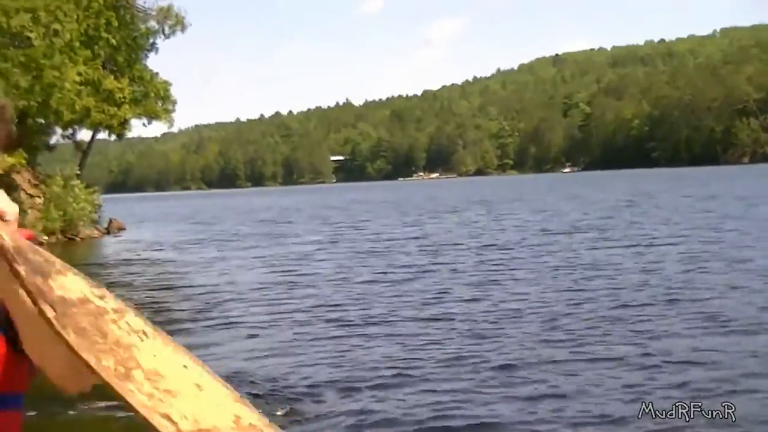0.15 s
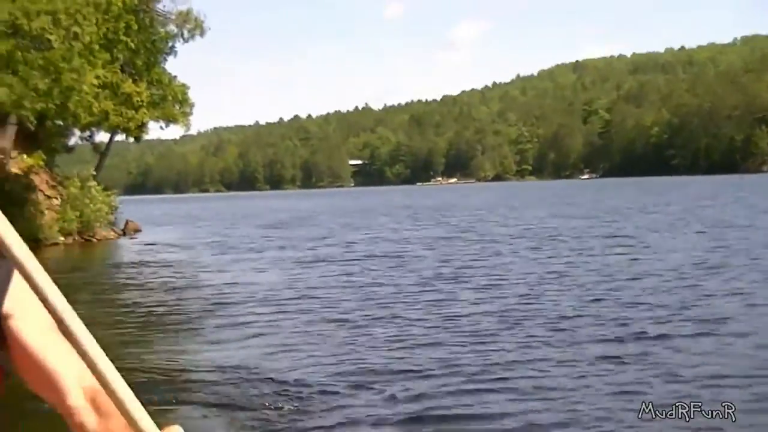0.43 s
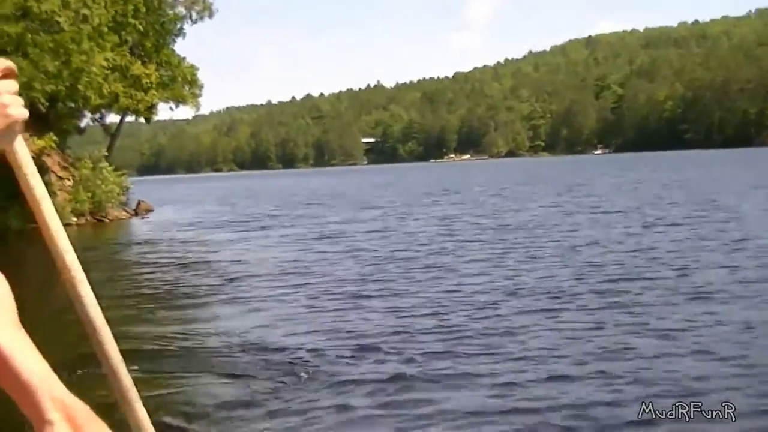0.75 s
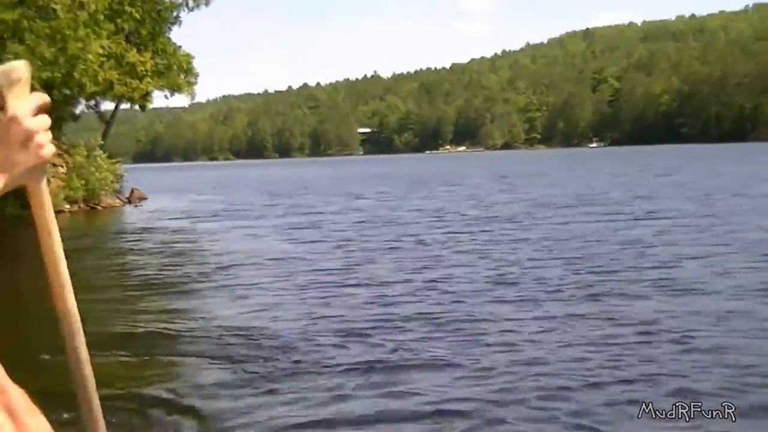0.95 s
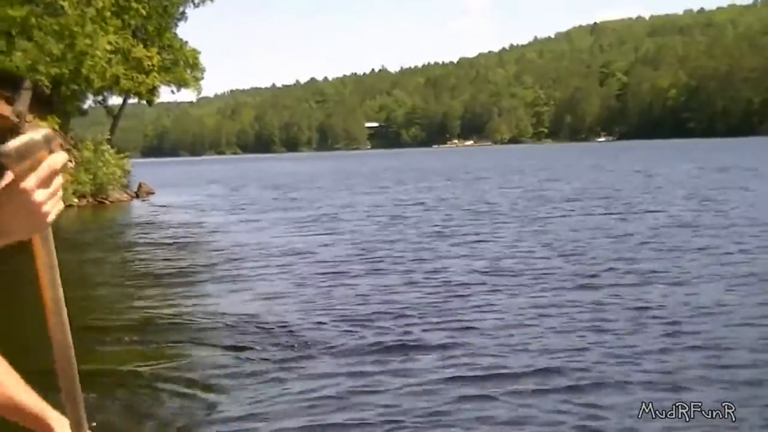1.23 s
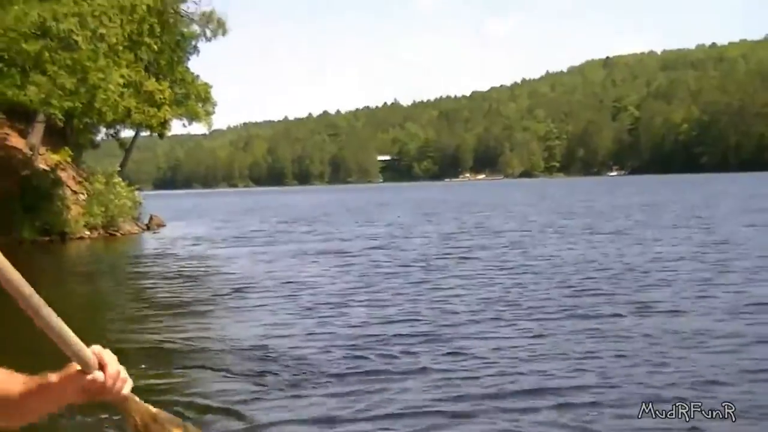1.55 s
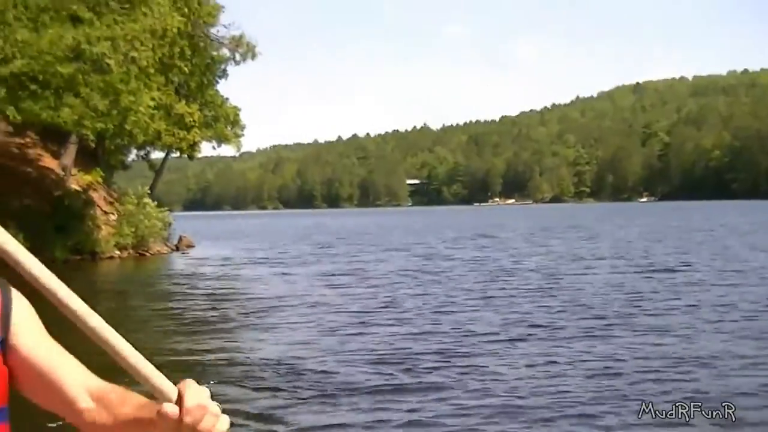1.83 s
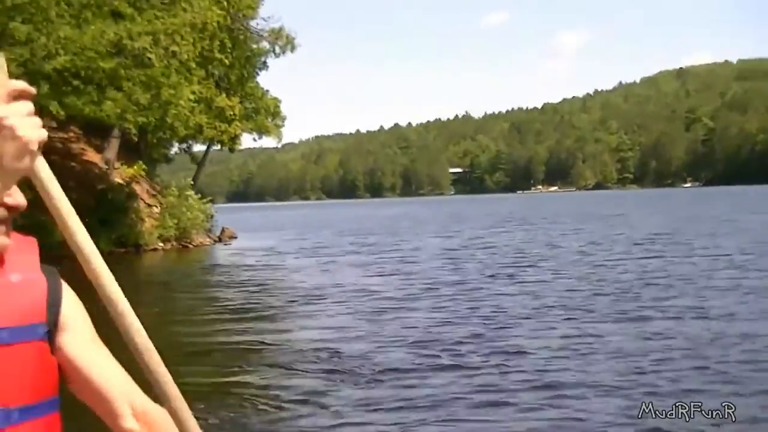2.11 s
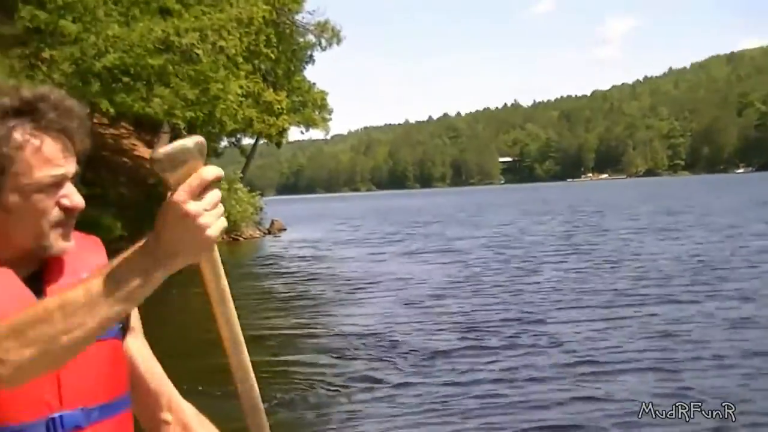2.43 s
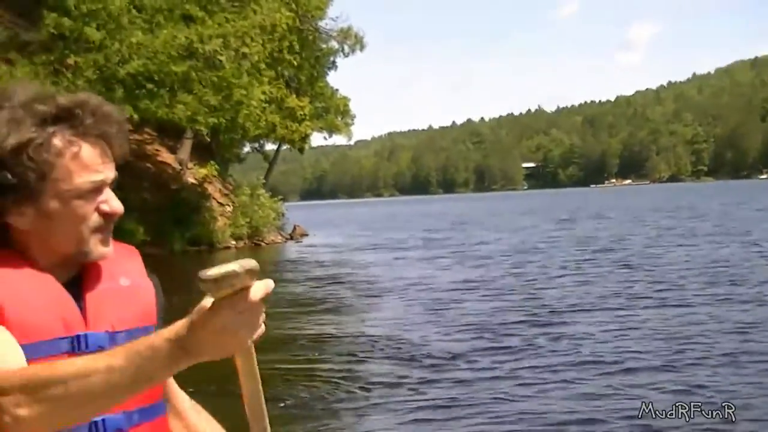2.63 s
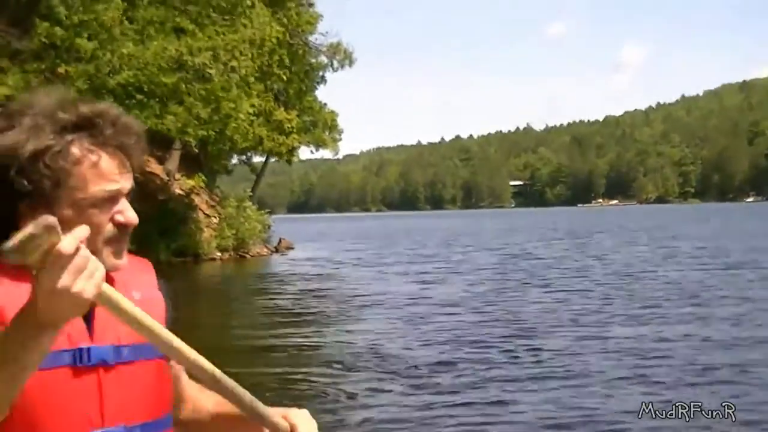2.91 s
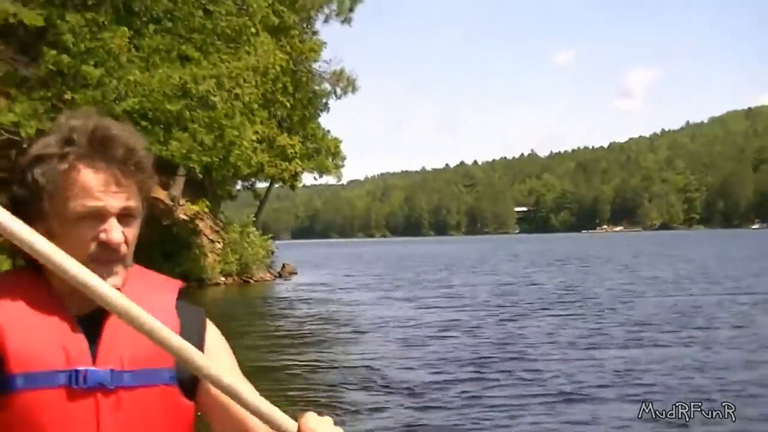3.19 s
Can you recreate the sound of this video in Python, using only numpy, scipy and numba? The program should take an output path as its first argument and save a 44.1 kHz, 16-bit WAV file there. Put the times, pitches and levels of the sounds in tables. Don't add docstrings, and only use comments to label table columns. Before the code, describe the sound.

A paddle slaps into lake water, gurgles and swishes, drips as it lifts, then slaps in louder for a second bubbling stroke; small camera microphone at arm's length, outdoors, with soft low wind puffs.

```python
import sys
import numpy as np
from scipy import signal
from scipy.fft import rfft, irfft
from scipy.io import wavfile
from scipy.ndimage import uniform_filter1d
from numba import njit

SR = 44100
rng = np.random.default_rng(int(sys.argv[2]) if len(sys.argv) > 2 else 0)


def decibels_to_gain(level_db):
    exponent = np.asarray(level_db, float) / 20
    return 10 ** exponent


def wav_record(signal):
    frames = np.transpose(np.atleast_2d(signal))
    bounded = np.clip(frames, -1, 1)
    quanta = np.round(bounded * 32767).astype(np.int16)
    wavfile.write(sys.argv[1], SR, quanta)


N = 147735
BUBBLE_GLIDE = 0.2


def unit(x):
    return x / np.sqrt(np.mean(x ** 2))


def colour(x, points):
    f, db = np.array(points).T
    grid_hz = np.arange(1, 4098) * SR / 8192
    log_gain = np.interp(np.log(grid_hz), np.log(f), db) * np.log(10) / 20
    cepstrum = irfft(log_gain)
    cepstrum[1:4096] *= 2
    cepstrum[4097:] = 0
    response = irfft(np.exp(rfft(cepstrum)))
    return signal.fftconvolve(x, response)[:len(x)]


def walk(rate):
    hold = int(SR / rate)
    steps = np.clip(rng.standard_normal(N // 100)[:N // hold + 1], -2, 2)
    slewed = uniform_filter1d(np.repeat(steps, hold), hold)
    return 1.5 * uniform_filter1d(slewed, hold)[:N]


@njit
def ring(n, start, hz, cycles, size, glide):
    y = np.zeros(n)
    for g in range(len(start)):
        first = int(start[g])
        life = cycles[g] * SR / hz[g]
        phase, step = 0., 2 * np.pi * hz[g] / SR
        for i in range(min(int(2 * life), n - first)):
            phase += min(step * (1 + glide[g] * i / life), 3.)
            swell = min(phase / 9, 1.)
            y[first + i] += size[g] * swell * np.exp(-3.5 * i / life) * np.sin(phase)
    return y


def crowd(rate, low_hz, high_hz, cycles, spread_db, db, tilt_db, count):
    u = rng.random((count, 5)).T
    s = np.cumsum(-np.log(1 - u[0])) / rate
    keep = s < N / SR
    bunching_db = 1.3 * walk(60)[np.minimum(s * SR, N - 1).astype(int)]
    size_db = np.minimum(-spread_db * np.log(1 - u[1]), 4 * spread_db) + bunching_db
    hz = low_hz * (high_hz / low_hz) ** u[2]
    size = decibels_to_gain(size_db + tilt_db * np.log2(hz / low_hz))
    life = cycles * (.5 + u[3])
    glide = 2 * BUBBLE_GLIDE * u[4]
    y = ring(N, s[keep] * SR, hz[keep], life[keep], size[keep], glide[keep])
    return y, db


def bursts(s, db, hz, length, count, low, high, others_db, cycles):
    s, db, hz, length = (np.reshape(v, (-1, 1)) for v in (s, db, hz, length))
    u = rng.random((len(s), 3, count))
    later = np.arange(count) > 0
    start = (s + length * u[:, 0] * later) * SR
    f = np.minimum(hz * np.where(later, low * (high / low) ** u[:, 1], 1), .4 * SR)
    life = np.where(later, cycles * (.5 + u[:, 2]), np.clip(length * hz, 3, 40))
    size = decibels_to_gain(db - 1.0 + others_db * later * (0.32 + u[:, 2]))
    glide = BUBBLE_GLIDE * u[:, 2]
    return ring(N, start.ravel(), f.ravel(), life.ravel(), size.ravel(), glide.ravel())


# [t/s, gurgle level/dB, wash level/dB, spray level/dB]
STIR = [(0, -49, -78, -58), (.41, -77, -63, -68), (0.469, -55.5, -56, -58.5), (.63, -62, -70, -58.5),
        (0.648, -58, -41, -45), (.9, -43, -37.5, -48.5), (1.0, -37, -40, -49), (1.15, -35, -35, -50),
        (1.33, -35, -33, -42.5), (1.385, -40.5, -39, -51.5), (1.68, -47.5, -46, -59),
        (1.8, -44.5, -42.5, -49.5), (2.1, -54.5, -49.5, -61.5), (2.235, -50.5, -43, -50),
        (2.273, -43, -37, -48.5), (2.8, -38, -36.5, -49), (2.9, -45.5, -40, -54),
        (3.35, -49.5, -49.5, -53.5)]
# [rate/(1/s), lowest f/Hz, highest f/Hz, ring/cycles, size spread/dB, level/dB, tilt/(dB per octave)]
GURGLE = (480, 320.5, 1036, 13, 3, 0.5, 6.5)
WASH = (2100, 1106, 3465, 16, 3, -2, -1.5)
SPRAY = (4200, 2940, 14600, 9.9, 2.6, 4, 0.1)
# [f/Hz, level/dB]
SPRAY_COLOUR = [(1470, 29), (2500, 8), (3010, -34), (3880, 0.5), (4770, 6.5), (6590, 6), (13900, -8.5),
                (15700, -8.5)]


def stirred_water():
    t = np.arange(N) / SR
    stir_s, gurgle_db, wash_db, spray_db = np.array(STIR).T
    large, large_db = crowd(*GURGLE, count=4000)
    middle, middle_db = crowd(*WASH, count=12000)
    fine, fine_db = crowd(*SPRAY, count=30000)
    gurgle = unit(large) * decibels_to_gain(large_db + np.interp(t, stir_s, gurgle_db))
    wash = unit(middle) * decibels_to_gain(middle_db + np.interp(t, stir_s, wash_db))
    spray = unit(colour(fine, SPRAY_COLOUR)) * decibels_to_gain(fine_db + np.interp(t, stir_s, spray_db))
    shared_surge = decibels_to_gain(2.1 * walk(120))
    return gurgle + shared_surge * (wash + spray)


# [t/s, peak level/dB, f/Hz, length/s]
PLOPS = [(0.004, -37, 527, 0.04), (0.027, -32, 746, 0.02), (0.101, -32, 774, 0.012),
         (0.524, -40, 1600, 0.012), (0.643, -25.5, 680, 0.023), (0.653, -23.5, 1214, 0.022),
         (0.687, -20, 890, 0.025), (0.71, -24, 1000, 0.015), (0.748, -25, 1470, 0.017),
         (0.813, -32, 1340, 0.011), (0.908, -34, 1100, 0.026), (0.931, -25, 826, 0.015),
         (0.966, -25.5, 560, 0.015), (0.948, -19.5, 1645, 0.016), (0.998, -23, 381, 0.072),
         (1.025, -18.5, 716, 0.02), (1.038, -19.5, 697, 0.02), (1.084, -21, 623, 0.01),
         (1.127, -13, 526, 0.019), (1.149, -16, 640, 0.023), (1.174, -20.5, 676, 0.032),
         (1.22, -22.5, 597, 0.021), (1.285, -15.5, 593, 0.021), (1.315, -14.5, 1126, 0.015),
         (1.348, -11.5, 645, 0.011), (1.441, -20.5, 580, 0.02), (1.555, -31.5, 1510, 0.012),
         (1.693, -31.5, 752, 0.027), (1.738, -26, 1870, 0.023), (1.896, -42, 1270, 0.03),
         (2.099, -33.5, 1410, 0.016), (2.16, -27, 1355, 0.011), (2.257, -26.5, 590, 0.017),
         (2.332, -24, 1720, 0.0089), (2.425, -25, 850, 0.042), (2.461, -13, 846, 0.018),
         (2.474, -19, 585, 0.024), (2.515, -28.5, 281, 0.036), (2.559, -21.5, 1800, 0.012),
         (2.589, -23, 1680, 0.021), (2.658, -18.5, 1880, 0.014), (2.662, -20.5, 856, 0.016),
         (2.733, -22, 1160, 0.012), (2.819, -17.5, 1280, 0.0091), (2.866, -24.5, 1750, 0.011),
         (2.903, -21.5, 629, 0.012), (2.914, -23, 622, 0.027), (3.006, -30.5, 1480, 0.016),
         (3.049, -28.5, 850, 0.019), (3.139, -34, 623, 0.018), (3.277, -36, 696, 0.02)]


def plops():
    return bursts(*np.array(PLOPS).T, count=6, low=0.798, high=1.53, others_db=-10, cycles=11.0)


# [t/s, peak level/dB, f/Hz, length/s]
SLAPS = [
    (0.6754, -14, 1284, 0.015),
    (.676, -14.5, 1835, 0.013),
    (2.2777, -9.5, 1072, 0.0073),
    (2.278, -6, 1300, 0.0089),
]


def slaps():
    return bursts(*np.array(SLAPS).T, count=5, low=0.7, high=1.55, others_db=-4.5, cycles=5.1)


# [t/s, peak level/dB, f/Hz, bright hiss level/dB]
DROPS = [(0.46, -37, 5700, -47), (0.4765, -39, 4550, -35.5), (0.605, -38, 5340, -42),
         (0.6384, -29, 6000, -26), (0.666, -22.5, 5060, -28), (0.839, -32, 2920, -34.5),
         (0.9477, -20, 2860, -42), (1.04, -28, 3100, -55), (1.06, -20.5, 5100, -57),
         (1.068, -20, 3020, -60), (1.0986, -25.5, 5900, -59), (1.2166, -22, 3570, -52),
         (1.267, -45, 3060, -43), (1.315, -16, 2800, -27), (1.4805, -35, 4800, -40),
         (1.5444, -22, 4260, -37), (1.691, -38.5, 7160, -50), (1.772, -36, 7200, -50),
         (1.783, -30, 5760, -38), (1.8554, -35, 5330, -54), (1.869, -32, 7850, -55),
         (1.9085, -37, 5220, -37), (1.931, -30.5, 8190, -48), (1.943, -31.5, 2950, -36),
         (1.9698, -28.5, 2920, -47), (1.9973, -28.5, 4800, -62), (2.077, -29.5, 4540, -51),
         (2.133, -28.5, 5130, -40), (2.167, -25, 5730, -36), (2.1918, -27.5, 5000, -41),
         (2.203, -30, 6430, -56), (2.2233, -25, 6150, -57), (2.2578, -27, 2960, -30),
         (2.361, -38, 4700, -49), (2.38, -26, 3070, -40.5), (2.4526, -36, 5950, -54),
         (2.47, -29, 4170, -42), (2.5613, -25, 4030, -64), (2.582, -33, 4900, -48),
         (2.624, -23.5, 5000, -52), (2.6566, -15.5, 4760, -27.5), (2.7086, -24, 4800, -55),
         (2.731, -25, 4430, -48), (2.7803, -25.5, 3520, -30), (2.929, -36, 4240, -44),
         (2.965, -39, 9600, -43), (3.0382, -30.5, 5230, -52), (3.113, -39, 5800, -54),
         (3.1517, -38, 4960, -40), (3.227, -28, 5630, -40), (3.24, -22.5, 7200, -49),
         (3.292, -31.5, 5130, -29.5)]


def drops():
    drop_s, hiss_s = .0045, .003
    s, db, hz, hiss_db = np.array(DROPS).T
    strikes = np.zeros(N)
    strikes[((s - hiss_s / 2) * SR).astype(int)] = decibels_to_gain(hiss_db - 5.5)
    fade = signal.lfilter([1], [1, -np.exp(-1 / (hiss_s * SR))], strikes)
    fade = signal.lfilter(np.hanning(220) / 75, [1], fade)
    band = signal.butter(1, [5500, 13500], "band", fs=SR, output="sos")
    hiss = signal.sosfilt(band, rng.standard_normal(N))
    knots = bursts(s, db, hz, drop_s, count=7, low=0.8, high=1.63, others_db=1, cycles=4.3)
    return knots + fade * hiss


# [t/s, peak level/dB, f/Hz, length/s]
TRICKLES = [
    (0.462, -41, 1590, 0.0091),
    (0.482, -37.5, 2630, 0.011),
    (0.651, -34, 521, .075),
    (1.124, -27, 2280, .01),
    (1.255, -25, 2140, 0.011),
    (1.874, -31, 2190, 0.011),
    (2.159, -34, 8700, .006),
    (2.482, -20, 1160, 0.015),
    (3.23, -28.5, 1980, 0.0059),
]


def trickles():
    return bursts(*np.array(TRICKLES).T, count=4, low=0.66, high=1.36, others_db=-7, cycles=5.6)


# [t/s, peak level/dB, length/s]
PUFFS = [(0.112, -31, 0.028), (0.005, -48.5, 0.034), (0.153, -68, 0.036), (0.307, -50, 0.029),
         (0.369, -46, 0.033), (0.335, -47, 0.028), (0.391, -29.5, 0.027), (0.4, -45, 0.026),
         (0.467, -53, 0.037), (0.597, -46, 0.019), (0.624, -44, 0.039), (0.669, -52, 0.028),
         (0.71, -47, 0.05), (0.788, -39.5, 0.032), (0.85, -35.5, 0.072), (0.934, -37.5, 0.024),
         (0.954, -32, 0.12), (1.068, -20, 0.026), (1.119, -28.5, 0.078), (1.324, -25.5, 0.062),
         (1.415, -39.5, 0.06), (1.197, -47, 0.031), (1.622, -26, 0.065), (1.717, -43.5, 0.044),
         (1.783, -45, 0.11), (1.907, -46, 0.092), (2.071, -40, 0.021), (2.396, -40.5, 0.019),
         (2.432, -47.5, 0.086), (2.554, -55, 0.031), (2.679, -35, 0.063), (2.736, -25, 0.025),
         (2.781, -35, 0.023), (2.931, -39, 0.05), (3.016, -27.5, 0.071), (3.158, -42.5, 0.064),
         (3.223, -39, 0.067), (3.275, -36, 0.029)]
# [f/Hz, level/dB]
WIND_COLOUR = [(18, -50), (40, -59), (75, -10), (130, 2), (240, 1.4), (335, -8), (450, -26.5), (800, -50)]


def wind():
    t = np.arange(N) / SR
    air = unit(colour(rng.standard_normal(N), WIND_COLOUR))
    out = air * decibels_to_gain(-65 + 2.5 * walk(30.38))
    for s, db, length in PUFFS:
        puff = air * np.sin(np.pi * np.clip((t - s) / length, 0, 1) ** 0.61)
        out = out + decibels_to_gain(db) * puff / np.abs(puff).max()
    return out


# [f/Hz, level/dB]
LAKE_COLOUR = [(150, -16), (350, -5), (1100, -7), (2500, -3.5), (3800, -11), (5000, -11.5), (9500, -14.5),
               (15700, -26)]


def lake():
    lake_db, lap_db = -53.5, 1.2
    wake_db, wake_ends_s, wake_fade_s = 3.5, 0.31, 0.015
    t = np.arange(N) / SR
    wake = wake_db / (1 + np.exp((t - wake_ends_s) / wake_fade_s))
    floor = unit(colour(rng.standard_normal(N), LAKE_COLOUR))
    return floor * decibels_to_gain(lake_db + wake + lap_db * walk(7.2))


def scene():
    paddle = stirred_water() + plops() + slaps() + drops() + trickles()
    return (paddle + wind() + lake())[None]


def low_pass(x):
    return signal.sosfilt(signal.butter(12, 15890, fs=SR, output="sos"), x)


def record(dry):
    rumble_cut = signal.butter(2, 65, "high", fs=SR, output="sos")
    top_cut = signal.ellip(10, .2, 80, 15800, fs=SR, output="sos")
    mix = signal.sosfilt(top_cut, signal.sosfilt(rumble_cut, dry))
    return low_pass(mix)


dry = scene()
out = record(dry)
wav_record(out)
```